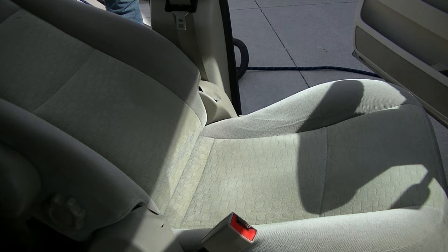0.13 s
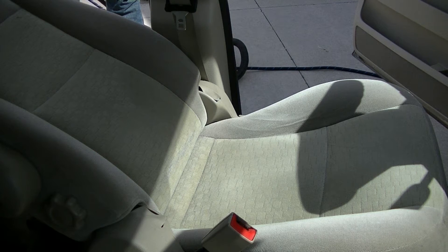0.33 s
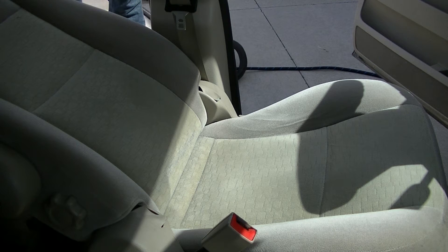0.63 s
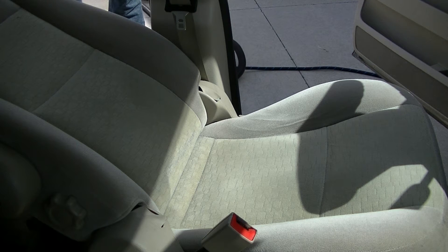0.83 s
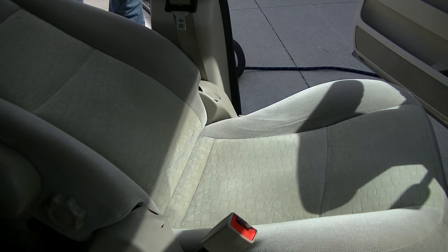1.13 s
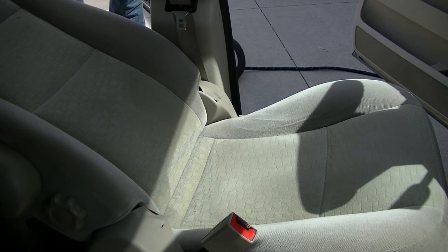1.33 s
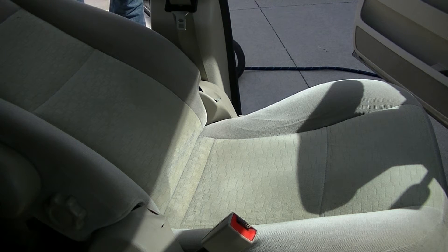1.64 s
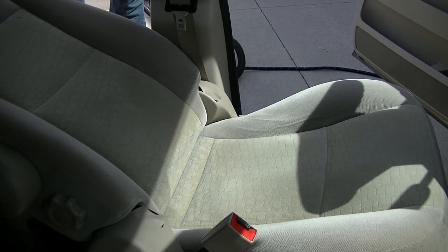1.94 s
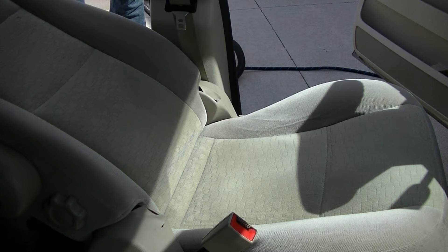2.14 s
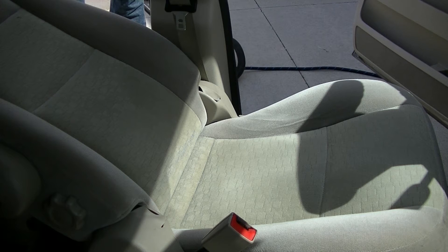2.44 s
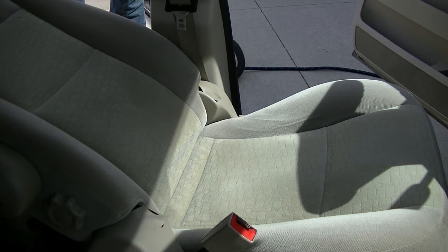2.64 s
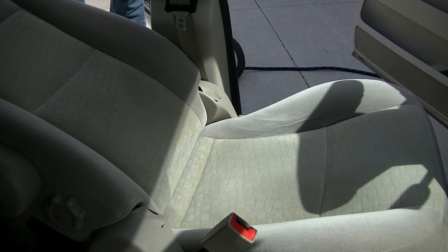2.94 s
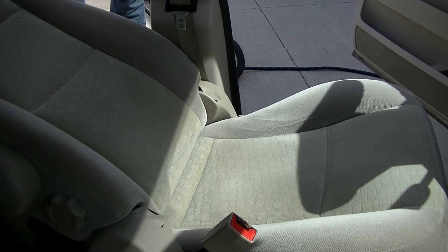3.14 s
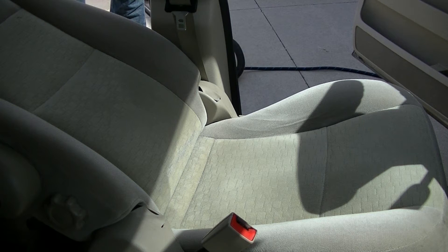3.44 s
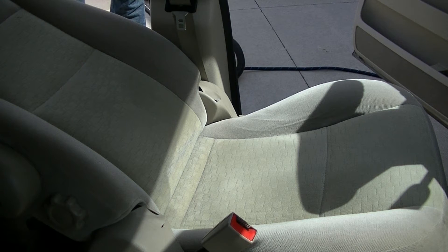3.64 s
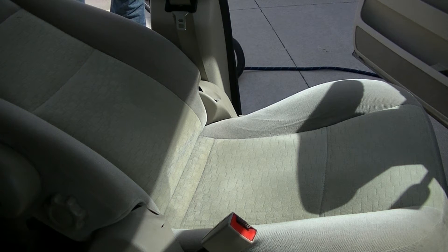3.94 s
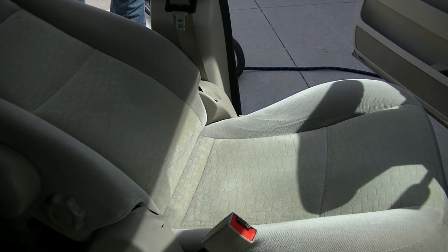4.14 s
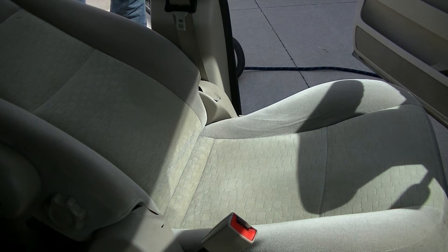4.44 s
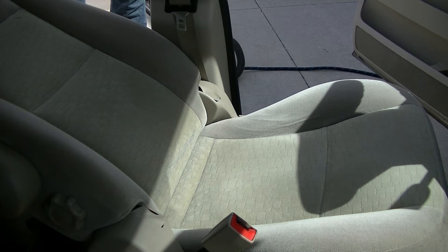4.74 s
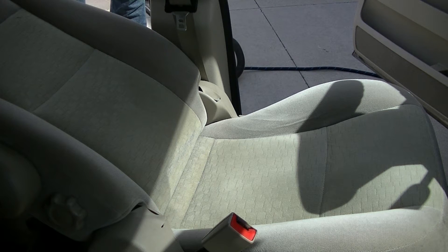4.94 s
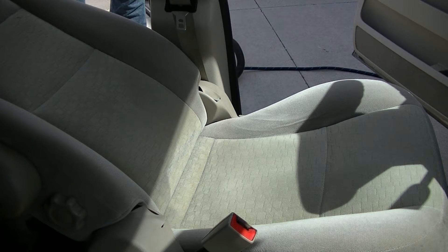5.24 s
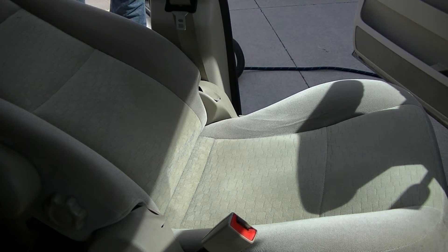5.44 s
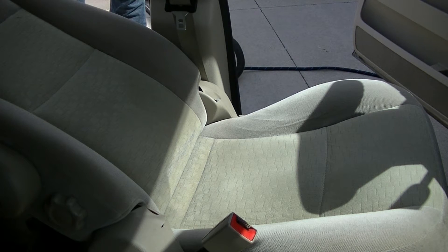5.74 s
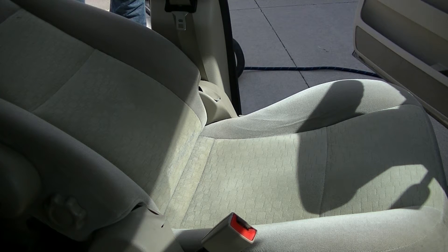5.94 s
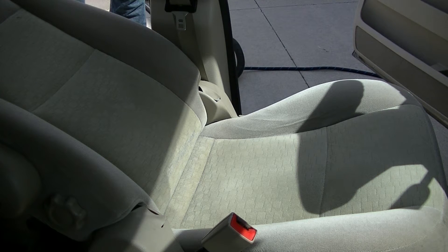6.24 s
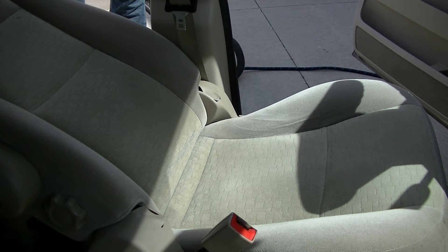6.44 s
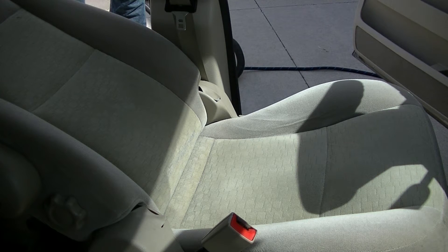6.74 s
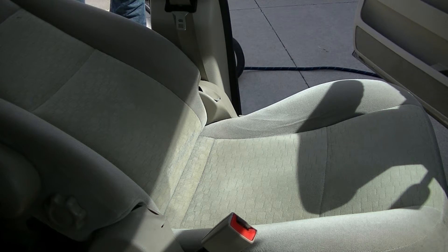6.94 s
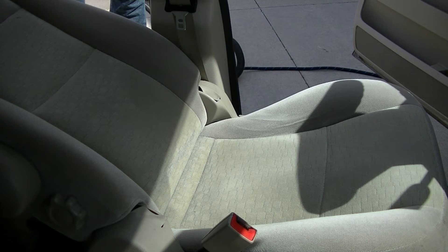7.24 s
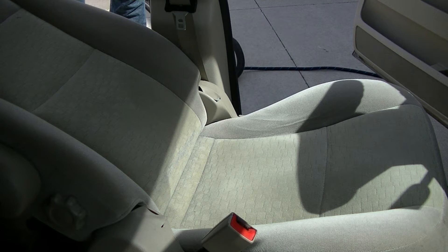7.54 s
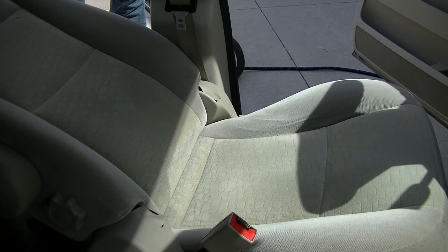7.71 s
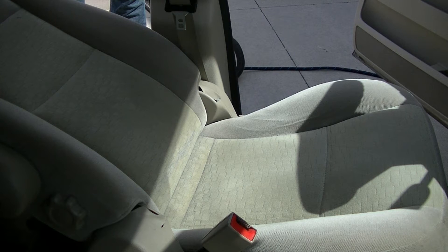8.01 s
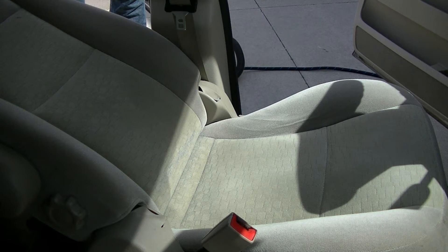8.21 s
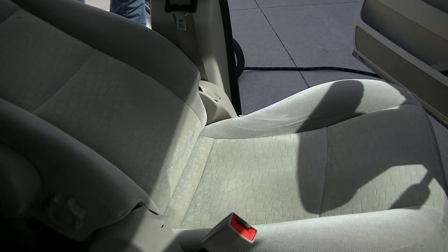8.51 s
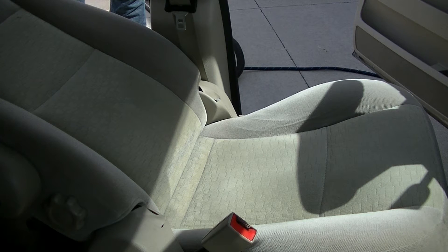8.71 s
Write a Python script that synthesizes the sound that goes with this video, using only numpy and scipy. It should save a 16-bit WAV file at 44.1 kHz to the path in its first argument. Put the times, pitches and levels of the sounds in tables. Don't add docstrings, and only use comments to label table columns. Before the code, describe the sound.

Wet, spitting steam hiss just outside an open car door, briefly cut off, then resuming and smoothing out while wind thumps the microphone.

```python
import sys
import numpy as np
from scipy import signal
from scipy.fft import rfft, irfft, next_fast_len
from scipy.io import wavfile
from scipy.ndimage import uniform_filter1d, map_coordinates

SR = 44100
rng = np.random.default_rng(int(sys.argv[2]) if len(sys.argv) > 2 else 0)


def invert_db(level):
    return 10 ** (np.asarray(level, dtype=float) / 20)


def waveform_to_disk(signal):
    frames = np.transpose(np.atleast_2d(signal))
    scaled = np.clip(frames, -1, 1) * 32767
    samples = np.round(scaled).astype(np.int16)
    wavfile.write(sys.argv[1], SR, samples)


N = 391166
T = np.arange(N) / SR

# freq_hz, density_db_per_hz
YARD_SPECTRUM = [(290, -28), (500, -13), (900, -7), (1690, -12.5), (3000, -19), (4120, -27), (6000, -30),
                 (15700, -41)]
# freq_hz, likeness_0_to_1
YARD_LIKENESS = [(500, 0.99), (1400, 0.79), (15000, 0.7)]
# start_s, end_s, start_hz, middle_hz, end_hz, level_db
CHIRPS = [
    (1.95, 2.0, 4800, 4600, 3700, -66),
    (2.085, 2.125, 5000, 4350, 4900, -60),
    (2.14, 2.165, 1850, 1950, 2200, -62),
    (2.26, 2.29, 1850, 1950, 2300, -66),
    (2.29, 2.32, 3900, 3800, 3400, -66),
]
# time_s, level_db
BREEZE = [(0, -49), (.4, -51.5), (.85, -45.5), (1.1, -52.5), (1.39, -35.5), (1.62, -47), (1.85, -58),
          (2.2, -73), (2.7, -59), (3.3, -58.5), (4.4, -61.5), (5, -59.5), (5.8, -63), (6.5, -57),
          (7.2, -65.5), (8.1, -62), (8.87, -58)]
# start_s, length_s, lift_db
GUSTS = [(0.0, 0.43, -8), (0.728, 0.15, 3), (1.142, 0.05, 4), (1.232, 0.32, -5), (1.606, 0.071, 3),
         (1.711, 0.17, 7), (2.0, 0.11, 10), (2.29, 0.21, 9), (2.529, 0.4, 1.5), (2.744, 0.33, -1),
         (3.178, 0.33, 5.5), (3.572, 0.084, 11), (3.851, 0.2, 7), (4.171, 0.073, 3), (4.724, 0.099, 18),
         (4.814, 0.26, 10.5), (5.098, 0.1, 9), (5.383, 0.33, 15), (5.857, 0.2, 7), (6.246, 0.12, 4),
         (6.306, 0.28, 12.5), (6.55, 0.31, 9.5), (6.984, 0.075, 8), (8.077, 0.087, 7), (8.211, 0.16, 6.5),
         (8.371, 0.057, 3), (8.541, 0.15, 12), (8.79, 0.14, 20.5)]
# freq_hz, density_db_per_hz
RUMBLE_SPECTRUM = [(30, -7), (70, -9.5), (130, -2), (200, -1.5), (320, -14.5), (500, -35), (1000, -87)]
# freq_hz, density_db_per_hz
FLUTTER_SPECTRUM = [(60, -44), (150, -7), (250, 2.5), (400, -1), (700, -15.5), (1200, -14.5), (2500, -83)]
# time_s, peak_db, centre_hz, left_minus_right_db
POPS = [(0.817, -32, 371, -4), (0.892, -36, 139, 9), (1.167, -31.5, 202, -11), (1.385, -27.5, 150, -1),
        (1.634, -37, 213, -2), (1.747, -35, 205, -1), (1.817, -24, 215, 1), (1.918, -41, 205, 16),
        (2.04, -26.5, 330, -7), (2.077, -39, 300, -13), (2.306, -39, 312, -3), (2.361, -41, 560, -6),
        (3.25, -40, 269, -13), (3.6, -25, 350, 4), (3.932, -32, 444, 13), (4.763, -28.5, 328, -18),
        (4.974, -27, 318, -8), (5.442, -16.5, 310, 3), (5.603, -33, 320, -1), (5.983, -34, 616, 10),
        (6.271, -31, 263, 6), (6.303, -31, 310, 7), (6.451, -16.5, 477, 4), (6.566, -27.5, 275, 5),
        (7.011, -39, 253, 10), (8.388, -26, 260, 3), (8.421, -17, 517, -11), (8.591, -23.5, 523, -8),
        (8.632, -33, 296, 17), (8.847, -25, 630, 0)]
# time_s, peak_db, centre_hz, left_minus_right_db
EDDIES = [(1.786, -43, 260, 4), (1.946, -44, 345, 7), (2.015, -38, 415, -4), (2.058, -40, 300, 7),
          (2.183, -45, 339, 13), (2.388, -40, 393, -11), (2.407, -36, 325, -4), (2.424, -37, 391, -11),
          (2.47, -41, 383, 13), (2.695, -33, 583, -3), (3.395, -41, 416, 11), (3.963, -37, 473, -6),
          (4.211, -35, 341, 11), (4.229, -38, 417, 9), (4.43, -36, 464, -9), (4.615, -37, 353, 5),
          (4.784, -34, 406, -11), (4.8, -38, 337, 0), (4.852, -41, 321, 11), (4.957, -34.5, 332, 11),
          (4.994, -39, 419, 1), (5.235, -37.5, 381, -15), (5.426, -33, 376, -10), (5.549, -37, 475, 12),
          (5.575, -41, 338, -9), (5.895, -38, 390, -10), (6.195, -38, 379, 8), (6.369, -34, 325, 4),
          (6.386, -38, 314, -2), (6.665, -37, 503, -13), (6.709, -34, 437, -9), (6.772, -34, 374, -4),
          (8.136, -42, 340, 9), (8.611, -31, 485, 6), (8.693, -39, 295, 11), (8.709, -41, 295, -7),
          (4.752, -31, 420, -8), (6.469, -35, 300, 6), (2.09, -43, 480, -6), (1.857, -50, 200, 0),
          (8.73, -41, 200, 0)]
# time_s, level_db
PRESSURE = [(0, -21), (.3, -24), (1.4, -26), (2.6, -22.5), (3.3, -25), (4.8, -23), (5.8, -22.5),
            (6.4, -23.5), (7.5, -22), (8.3, -23.5), (8.8, -23.5), (8.87, -27.5)]
# start_s, length_s, lift_db
SURGES = [(0.03, 0.27, 7.5), (.38, 0.096, 2.5), (.52, 0.13, 4.5), (.61, 0.094, 7), (.774, 0.09, 8.5),
          (.905, 0.21, 8), (1.16, 0.079, 10), (1.28, 0.12, 6), (1.46, 0.036, 5.5), (1.495, 0.025, 5.5),
          (2.5, 0.25, 8), (2.77, 0.26, 8), (3.1, 0.13, 1), (3.27, 0.42, 0.5), (3.562, 0.066, 7.5),
          (3.73, 0.088, 4.5), (3.86, 0.12, 4.5), (4.2, 0.18, 1.5), (4.48, 0.2, 1), (4.725, 0.035, 4.5),
          (4.97, 0.061, 1.5), (5.13, 0.26, 1), (5.52, 0.067, 0.5), (5.63, 0.51, 1.5), (6.32, .13, 3),
          (6.52, 0.49, 1.5), (6.85, 0.28, 2.5), (7.53, 0.52, 2.5), (7.96, 0.99, 3.5), (8.45, 0.67, 1.5)]
# time_s, wetness_ratio
WETNESS = [(0, 3.2), (1.5, 2.6), (2.6, 2.1), (3.3, 4.5), (4.7, 3), (5.2, 1.1), (8.87, 0.39)]
# time_s, level_db
WET_SLUGS = [(0.117, -26), (0.257, -13), (0.387, -10), (0.408, -9.5), (0.428, -13), (0.533, -7.5),
             (0.547, -11), (0.586, -10), (0.642, -15), (0.709, -13), (0.782, -14), (0.799, -11),
             (0.913, -8), (0.929, -9.5), (1.099, -14), (1.18, -17), (1.206, -19), (1.256, -13),
             (1.326, -10), (1.343, -10.5), (1.477, -12.5), (2.566, -8.5), (2.588, -19), (2.685, -15.4),
             (2.699, -21), (2.777, -14), (2.79, -11), (2.851, -15), (3.062, -15), (3.118, -26),
             (3.145, -15), (3.168, -12), (3.184, -17), (3.209, -22), (3.296, -10.5), (3.317, -14),
             (3.338, -12), (3.382, -20), (3.398, -17), (3.418, -18.0), (3.46, -12), (3.475, -13),
             (3.571, -6.5), (3.589, -22), (3.625, -20), (3.694, -11), (3.738, -7.5), (3.785, -8.5),
             (3.8, -14), (3.818, -13), (3.869, -14), (3.889, -8), (3.982, -11), (4.019, -13), (4.049, -17),
             (4.081, -23), (4.145, -10.5), (4.238, -33), (4.256, -10.5), (4.308, -24)]
# time_s, level_db
DRY_SLUGS = [(4.331, -16), (4.385, -15.2), (4.409, -8.5), (4.427, -16), (4.513, -12), (4.528, -11),
             (4.55, -16), (4.604, -8.5), (4.663, -11.5), (4.736, -16), (4.999, -16), (5.017, -13),
             (5.041, -28), (5.088, -15.5), (5.213, -14), (5.266, -11), (5.324, -12.5), (5.34, -17.8),
             (5.372, -22), (5.399, -22), (5.542, -16), (5.571, -12), (5.653, -9.5), (5.672, -14),
             (5.816, -17.5), (5.927, -17), (5.967, -19), (6.066, -12), (6.096, -12), (6.167, -9),
             (6.594, -17.8), (6.817, -15.5), (6.899, -22), (6.981, -16), (7.053, -11.5), (7.073, -13),
             (7.104, -15), (7.173, -22), (7.216, -17), (7.277, -14), (7.315, -13), (7.498, -16),
             (7.608, -9.5), (7.623, -19), (7.67, -17), (7.724, -17), (7.785, -15), (7.8, -15), (7.875, -12),
             (7.936, -18), (8.023, -19), (8.094, -28), (8.13, -24), (8.14, -13), (8.167, -17.7),
             (8.262, -15), (8.329, -17), (8.358, -27), (8.369, -17.8), (8.505, -14)]
# start_s, end_s
HELD = [
    (0, 0.42),
    (.41, 0.91),
    (1.1, 1.4),
    (2.55, 2.64),
    (3.4, 4.2),
    (4.6, 5.4),
    (5.9, 8.87),
]
# freq_hz, density_db_per_hz
PLACE_COLOURS = [
    [(450, -12), (950, -44.5), (1500, -21), (2000, -10.5), (3000, 6.5), (3700, -17), (8000, -16),
     (15600, -25.5)],
    [(450, -18), (950, -32), (1500, -20), (2000, 1.1), (3000, -2.5), (3700, -17), (8000, -18),
     (15600, -20.5)],
    [(450, -17.5), (950, -27.5), (1500, -14), (2000, -5), (3000, -9), (3700, -15), (8000, -14),
     (15600, -22)],
    [(450, -18), (950, -28), (1500, -18.5), (2000, -1), (3000, -16.5), (3700, -12.5), (8000, -20.5),
     (15600, -25.5)],
    [(450, -19.5), (950, -28.5), (1500, -19.5), (2000, 5.5), (3000, 1.5), (3700, -13), (8000, -19),
     (15600, -21.5)],
    [(450, -25), (950, -31), (1500, -20.5), (2000, 7), (3000, 2.2), (3700, -17), (8000, -15),
     (15600, -20.5)],
    [(450, -21.5), (950, -34.5), (1500, -21.5), (2000, 6), (3000, 1.5), (3700, -16.5), (8000, -19.5),
     (15600, -18.5)],
]
# centre_hz, width_hz, gain_db
PATHS_A = [(1115, 410, 16.5), (1410, 64, -3), (2120, 125, -12), (2570, 70, -7), (2910, 320, -15),
           (3100, 200, -9.5), (3430, 120, -7), (3703, 120, 2), (3980, 290, -9.5), (5100, 320, 12),
           (5240, 120, -6), (5990, 200, 9.5), (7407, 700, -6.5), (9000, 690, 5)]
PATHS_B = [(1090, 360, 11), (2000, 120, -3.5), (2250, 150, -11), (2280, 69.6, -5), (3080, 200, -9),
           (3260, 120, 9.5), (3430, 340, -9.5), (3617, 200, 2), (4200, 120, 3.5), (5060, 260, 6.5),
           (5430, 200, 1), (6300, 670, 6.5), (9440, 820, 6.5), (13200, 670, -13)]
PATHS_C = [(1190, 120, 6.5), (1300, 62, -7), (2310, 93, -9), (2480, 200, 7), (2670, 200, -7),
           (2830, 190, 12.5), (3100, 70, -11), (3250, 100, 7), (3460, 120, -5), (3919, 680, 1),
           (4130, 200, -2.5), (5070, 130, 14.5), (6670, 600, 3.5), (10900, 600, -6)]
PATHS_D = [(1205, 210, 6.5), (1320, 51, -8), (2004, 75, -9.5), (2282, 105, -12), (2506, 130, 7),
           (2886, 173, 16.5), (3340, 200, 9.5), (3520, 140, -12), (3962, 120, 4), (4177, 124, -4),
           (4349, 750, -4), (5220, 310, 9.5), (6244, 600, 3), (8900, 760, 3.5)]
PATHS_E = [(1240, 120, 9.5), (1977, 85, -20), (2260, 170, -17), (2375, 120, -11), (2663, 78, -18),
           (3095, 220, -12.5), (3466, 204, -12), (4030, 100, 4.5), (4220, 230, -6), (5100, 120, 6),
           (6280, 510, 8), (8840, 670, 5.5), (9770, 350, 4.5), (14427, 350, 4)]
PATHS_F = [(1047, 100, 9), (1230, 62, 11.5), (1445, 70, 8), (2024, 205, -13), (2317, 160, -24),
           (2680, 70, -2.5), (3155, 550, -9), (3760, 120, -6), (4600, 350, -3), (5070, 210, 7),
           (7300, 350, -4.5), (7970, 200, -5.5), (10500, 650, -4.5), (12800, 550, -7)]
PATHS_G = [(1177, 470, 9), (1325, 38, -8.5), (2016, 142, -15), (2244, 210, -5.5), (2304, 163, -8.5),
           (2380, 63, -13.5), (3076, 650, -7.5), (3360, 110, -7), (4177, 150, -7.5), (5580, 350, 3),
           (6370, 460, 7.5), (7600, 230, 4), (8600, 300, 7), (12700, 500, -6)]
PLACE_PATHS = [PATHS_A, PATHS_B, PATHS_C, PATHS_D, PATHS_E, PATHS_F, PATHS_G]
# time_s, depth_db, recovery_s
DUCKS = [
    (1.826, 4.5, 0.085),
    (2.047, 3, .12),
    (4.77, 5.5, 0.1),
    (5.436, 6, .01),
    (5.447, 9, 0.045),
    (6.453, 9, 0.04),
    (8.397, 17, 0.017),
    (8.43, 5, 0.024),
    (8.6, 7, 0.07),
]
# low_hz, high_hz, tendency
WIDE_BANDS = [
    (0, 650, 3),
    (650, 1200, -.6),
    (2550, 2900, .4),
    (4900, 5500, .1),
    (9200, 10200, -.8),
]
WIDE_MOMENTS = [.43, .62, 1.17, 1.27, 1.85, 2.05, 2.4, 2.52, 2.7, 3.13, 3.4, 3.68, 3.9, 4.05, 4.25, 4.47,
                4.82, 5.1, 5.23, 5.4, 5.54, 5.68, 5.91, 6.57, 6.63, 6.7, 7.81, 8.12, 8.46, 8.6]

SHUT_S, BLEED_DB_PER_S = 1.522, 61.5
EMPTY_S, EMPTY_DB_PER_S = 1.595, 38
OPEN_S, OPENING_S, LEAK_DB = 2.477, .022, -38
FLUTTER_DB, FLUTTER_GUSTS, FLUTTER_BREEZE = -60, 1.18, 0.2
RUMBLE_GUSTS = 0.44
FIZZ_DB, FIZZ_PRESSURE, FIZZ_SURGES, FIZZ_VALVE = -22.5, 1, 0.2, 1.28


def unit(x):
    return x / np.sqrt(np.mean(x ** 2) + 1e-20)


def along(points, hz):
    f, v = np.transpose(points)
    return np.interp(np.log(hz + 1), np.log(f + 1), v, left=-120, right=-120)


def over_time(rows):
    time_s, value = np.transpose(rows)
    return np.interp(T, time_s, value)


def wobble(rate_hz):
    knots = rng.standard_normal(int(N * rate_hz / SR) + 4)
    return map_coordinates(knots, [T * rate_hz])


def filtered(x, response):
    m = next_fast_len(x.shape[-1] + 8192)
    spectrum = rfft(x, m) * response(np.fft.rfftfreq(m, 1 / SR))
    return irfft(spectrum, m)[..., :x.shape[-1]]


def swells(rows, rise, fall):
    lift_db = np.zeros(N)
    for start_s, length_s, db in rows:
        u = (T[round(start_s * SR):round((start_s + length_s) * SR)] - start_s) / length_s
        shape = np.clip(np.minimum(u / rise, (1 - u) / fall), 0, 1)
        lift_db[round(start_s * SR):][:len(u)] += db * shape
    return lift_db


def yard():
    def spread(hz):
        turn = np.arccos(np.clip(along(YARD_LIKENESS, hz), .2, 1)) / 2
        return invert_db(along(YARD_SPECTRUM, hz)) * [np.cos(turn), np.sin(turn)]

    mid, side = filtered(rng.standard_normal((2, N)), spread)
    return invert_db(-51.5 + .8 * wobble(8.6)) * np.array([mid + side, mid - side]) / np.std(mid)


def bird():
    out = np.zeros(N)
    for start_s, end_s, a_hz, b_hz, c_hz, level_db in CHIRPS:
        u = np.linspace(0, 1, round((end_s - start_s) * SR))
        pitch_hz = a_hz * (1 - u) ** 2 + 2 * b_hz * u * (1 - u) + c_hz * u ** 2
        whistle = np.sin(2 * np.pi * np.cumsum(pitch_hz) / SR)
        envelope = np.sqrt(abs(np.sin(np.pi * u)))
        out[round(start_s * SR):][:len(u)] += invert_db(level_db) * envelope * whistle
    return out


def wind():
    def buffeting(spectrum):
        return filtered(rng.standard_normal((2, N)), lambda hz: invert_db(along(spectrum, hz)))

    def lumps(depth_db, rate_hz):
        return invert_db(depth_db * np.minimum([wobble(rate_hz), wobble(rate_hz)], 1))

    breeze_db = over_time(BREEZE)
    gust_db = swells(GUSTS, rise=0.34, fall=0.3)
    rumble_db = breeze_db + RUMBLE_GUSTS * gust_db
    flutter_db = FLUTTER_DB + FLUTTER_BREEZE * (breeze_db - breeze_db.mean()) + FLUTTER_GUSTS * gust_db
    rumble = unit(lumps(2.2, 17) * lumps(6.6, 45) * buffeting(RUMBLE_SPECTRUM))
    flutter = unit(lumps(2.0, 14) * lumps(8.7, 75) * buffeting(FLUTTER_SPECTRUM))
    return invert_db(rumble_db + 6.5) * rumble + invert_db(flutter_db + 5.5) * flutter


def pops():
    out, t = np.zeros((2, N + SR)), np.arange(SR // 20) / SR
    burst = np.exp(-((t - .0065) / 0.0029) ** 2) + 0.5 * (t > .0065) * np.exp(-t / 0.012)
    for time_s, peak_db, centre_hz, pan_db in POPS + EDDIES:
        def response(f):
            ring = 1j * f * .9 * centre_hz / (centre_hz ** 2 - f * f + 1j * f * 0.8 * centre_hz)
            return ring * (1j * f / (130 + 1j * f) / (1 + 1j * f / 1150)) ** 2

        puff = filtered(rng.standard_normal((2, len(t))) * burst, response)
        puff = puff / abs(puff).max(axis=1, keepdims=True)
        side_db = np.array([[.5], [-.5]]) * pan_db
        out[:, round(time_s * SR):][:, :len(t)] += invert_db(peak_db + 5.5 + side_db) * puff
    return out[:, :N]


def valve_db(order=4):
    bleed_db = -BLEED_DB_PER_S * np.clip(T - SHUT_S, 0, None) - EMPTY_DB_PER_S * np.clip(T - EMPTY_S, 0, None)
    reopen = (1 - np.exp(-np.clip(T - OPEN_S, 0, None) / OPENING_S)) ** order
    return 20 * np.log10(np.maximum(invert_db(bleed_db), reopen) + invert_db(LEAK_DB))


def path_db(hz, count, ripple_db):
    def smooth_noise(bins, frames):
        noise = uniform_filter1d(rng.standard_normal((len(hz), count)), size=bins, axis=0)
        return uniform_filter1d(noise, size=frames, axis=1)

    def per_frame(curve):
        return curve[::N // count][:count]

    places = []
    for colour, paths in zip(PLACE_COLOURS, PLACE_PATHS):
        peaks_db = sum(db / (1 + (2 * (hz - centre_hz) / width_hz) ** 2) for centre_hz, width_hz, db in paths)
        places.append(along(colour, hz) + peaks_db)
    index = np.arange(len(HELD))
    where = np.interp(np.linspace(0, N / SR, count), np.ravel(HELD), np.repeat(index, 2))
    blend = np.clip(1 - abs(where - index[:, None]), 0, 1)
    gain_db = np.transpose(places) @ blend

    comb = smooth_noise(2, 24)
    stretch = 1 - .025 * (1 + np.tanh(per_frame(wobble(1.2))))
    bins = np.arange(len(hz))[:, None] * stretch
    comb = map_coordinates(comb, [bins, np.arange(count) + 0 * hz[:, None]], order=1)
    comb_depth = 0.62 + 0.31 / (1 + (4000 / (hz[:, None] + 1)) ** 4)

    weak = np.clip(-per_frame(valve_db()) / 14, 0, .8)
    gain_db = gain_db + weak * (uniform_filter1d(gain_db, size=24, axis=0) - gain_db)
    gain_db = gain_db + .8 * unit(smooth_noise(30, 3))
    return gain_db + ripple_db * unit(comb) * comb_depth


def slugs(roar_db):
    scatter_db = 2.5 * np.clip(rng.standard_normal(N), -3, .8)
    patter = rng.random(N) < 150 / SR
    starts = patter * over_time(WETNESS) * invert_db(roar_db - 13 + scatter_db)
    for time_s, level_db in WET_SLUGS + DRY_SLUGS:
        starts[round(time_s * SR)] = invert_db(level_db + 4.0)
    t = np.arange(SR // 20) / SR
    burst = (1 - np.exp(-(t / .0033) ** 1.5)) * np.exp(-(t / .0058) ** 1.8)
    return signal.fftconvolve(starts, burst)[:N]


def steam():
    hz, _, z = signal.stft(rng.standard_normal((2, N)), SR, nperseg=2048)
    low_cut = 1 + (560 / (hz[:, None] + 1)) ** 7
    z = z / low_cut * invert_db(path_db(hz, count=z.shape[2], ripple_db=3.5))
    core = 1 / (1 + (hz / 3700) ** 12) / (1 + (1100 / (hz + 1)) ** 8)

    def band(share):
        return unit(signal.istft(z * np.sqrt(share)[:, None], SR, nperseg=2048)[1][:, :N])

    pressure_db = over_time(PRESSURE)
    surge_db = swells(SURGES, rise=.12, fall=0.32)
    roar_db = pressure_db + surge_db + valve_db()
    fizz_db = FIZZ_DB + FIZZ_PRESSURE * (pressure_db - pressure_db.mean())
    fizz_db = fizz_db + FIZZ_SURGES * surge_db + FIZZ_VALVE * valve_db(order=3)

    steady = invert_db(roar_db - 1.38 + 0.69 * wobble(30))
    flared = np.sqrt(steady ** 2 + slugs(roar_db - 0.6 * surge_db + 5.0) ** 2)
    flare = flared / steady
    fizz_gain = invert_db(fizz_db - 0.9 + 0.86 * wobble(25)) * flare ** 0.42
    roar = band(core)
    turbulence = abs(uniform_filter1d(roar[0] ** 2, size=300) + .05)
    evened = turbulence ** (-.4 * (1 - .8 * flare ** -2))
    mid, side = flared * evened * roar + fizz_gain * band(1 - core)
    return np.array([mid + invert_db(-18.5) * side, mid - invert_db(-14.0) * side])


def ducking():
    dip_db, t = np.zeros(N + SR), np.arange(SR // 2) / SR
    for time_s, depth_db, recovery_s in DUCKS:
        dip = np.exp(-t / recovery_s) * (1 - np.exp(-t / 0.0014))
        dip_db[round(time_s * SR):][:len(t)] += 0.86 * depth_db * dip
    return invert_db(-dip_db[:N])


def scene():
    return (yard() + bird() + steam()) * ducking() + wind() + pops()


def narrowed(x):
    mid, side = (x[0] + x[1]) / 2, (x[0] - x[1]) / 2
    hz, t, z = signal.stft(side, SR, nperseg=1024)
    hz = hz[:, None]
    blocks = rng.random((len(hz) // 10 + 1, len(t) // 4 + 1))
    blocks = blocks.repeat(10, axis=0).repeat(4, axis=1)[:len(hz), :len(t)]
    moment = abs(t - np.array(WIDE_MOMENTS)[:, None]).min(axis=0) < .03
    keep = blocks < np.where(moment, 1.45 - hz / 13000, .05 - hz / 200000)
    for low_hz, high_hz, tendency in WIDE_BANDS:
        often = unit(uniform_filter1d(rng.standard_normal(len(t)), size=10)) < tendency
        keep = keep | ((hz >= low_hz) & (hz < high_hz) & often & (blocks < .85))
    side = signal.istft(z * keep, SR, nperseg=1024)[1][:N]
    return np.array([mid + side, mid - side])


def roll_off(x):
    return signal.sosfilt(signal.butter(12, 17000, fs=SR, output="sos"), x)


def record(dry):
    x = filtered(dry, lambda hz: 1j * hz / (55 + 1j * hz))
    x = x / (1 + abs(x / 1.08) ** 4) ** (1 / 4)
    x = narrowed(filtered(x, lambda hz: hz < 15850))
    mix = np.clip(x, -1, 1)
    return roll_off(mix)


dry = scene()
out = record(dry)
waveform_to_disk(out)
```